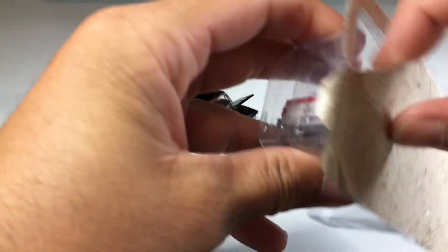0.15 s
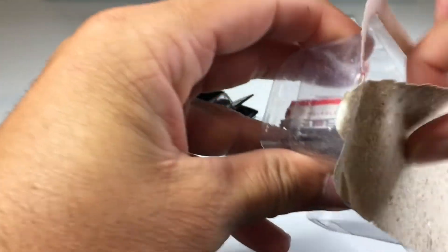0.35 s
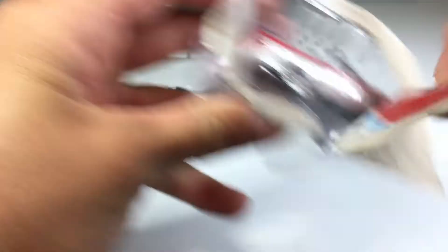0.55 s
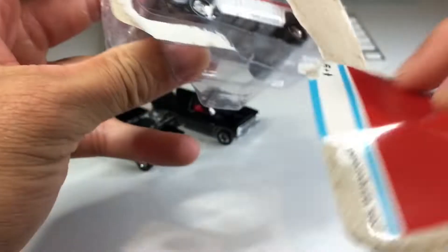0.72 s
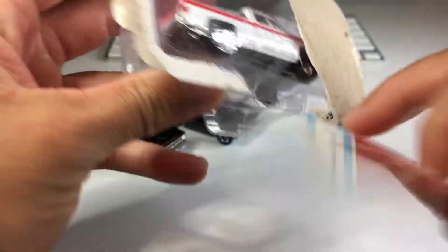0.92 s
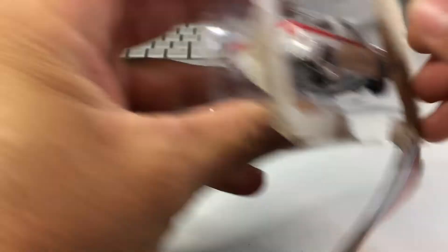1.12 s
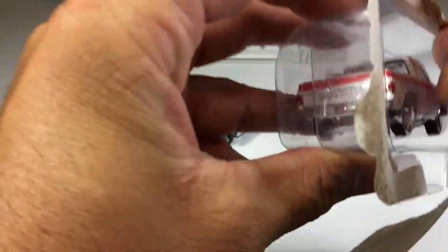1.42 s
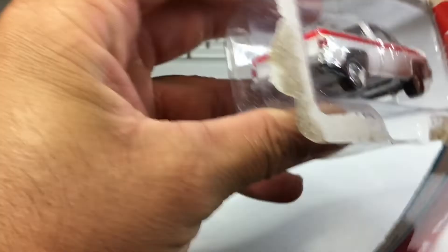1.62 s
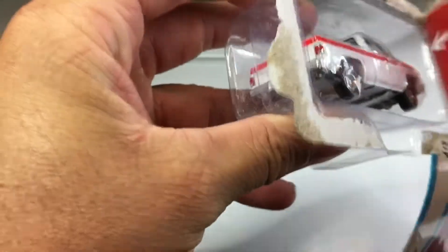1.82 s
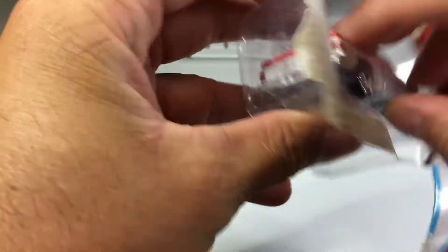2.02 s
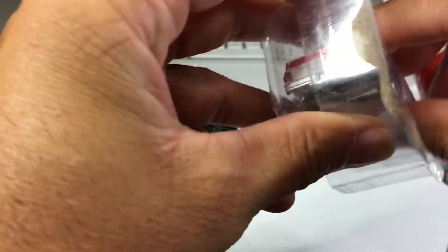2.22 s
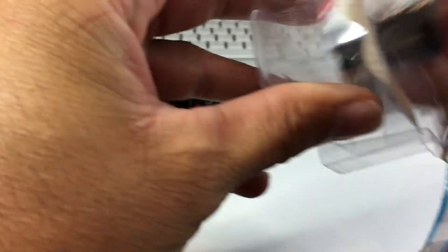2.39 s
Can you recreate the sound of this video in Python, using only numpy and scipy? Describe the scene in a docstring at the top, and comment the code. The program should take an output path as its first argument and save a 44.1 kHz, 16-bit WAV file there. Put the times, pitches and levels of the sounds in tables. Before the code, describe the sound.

A stiff plastic blister package crackles as hands pry it off glued card. After near quiet, sharp snaps begin around 0.2 seconds and build to a loud, dense papery rip at 0.43-0.6. Sparse ticks and small creaks follow until a second, smaller crackling burst at 1.45-1.65. Scattered light pops fade toward 2.5. Close, dry sound with a short room tail and faint low hum.

```python
"""A quiet room, heard close up: hands pry a clear plastic blister off its card.
A low hum of shaped noise lies underneath, with a dull, lumpy rub of the hands on the card.
Glued paper tears in a dense crackle of random clicks; short bursts and creaks also ring the shell.
The shell buckles in single snaps: ragged pushes ring its modes briefly, with a burst of treble.
A short, dull noise tail adds the room around the pack."""
import sys
import numpy as np
from scipy import signal
from scipy.io import wavfile
from scipy.ndimage import uniform_filter1d

SR = 44100
rng = np.random.default_rng(int(sys.argv[2]) if len(sys.argv) > 2 else 0)


def dump_mix(stems):
    """Bounce the given channels to the path in sys.argv[1] as a 16-bit WAV at rate SR."""
    frames = np.atleast_2d(stems).T  # one column per channel
    limited = np.clip(frames, -1, 1)  # hard clip at full scale
    pcm = np.round(limited * 32767).astype(np.int16)
    wavfile.write(sys.argv[1], SR, pcm)


N = 112454  # length in samples, about 2.55 s


def gain_of(db):
    """Turns decibels into a plain multiplier."""
    return 10 ** (np.asarray(db) / 20)


def evened(x):
    """Scales a signal to an average (RMS) level of one."""
    return x / np.sqrt(np.mean(x ** 2) + 1e-20)


def add(mix, start_s, sound):
    """Adds a sound into the mix at its start time, cut off at the end of the mix."""
    part = mix[round(start_s * SR):][:len(sound)]
    part += sound[:len(part)]


def follow(times_s, values):
    """Joins the points of a table by straight lines, one value per sample."""
    return np.interp(np.arange(N) / SR, times_s, values)


def band(x, low_hz, high_hz):
    """Keeps only the sound between two frequencies."""
    return signal.sosfilt(signal.butter(4, [low_hz, high_hz], "band", fs=SR, output="sos"), x)


def colour(x, points):
    """Gives x a spectrum, falling steeply outside the table, with no sound ahead of its cause."""
    points_hz, points_db = np.transpose(points)
    log_hz = np.log(np.fft.rfftfreq(2048, 1 / SR) + 1)
    log_points = np.log(points_hz)
    below = np.maximum(log_points[0] - log_hz, 0)
    above = np.maximum(log_hz - log_points[-1], 0)
    db = np.interp(log_hz, log_points, points_db) - 40 * (below + above)
    log_gain = np.log(gain_of(np.maximum(db, -90)))
    # The Hilbert transform of the log gain gives the phase of the most prompt filter
    full = np.concatenate([log_gain, log_gain[-2:0:-1]])
    taps = np.fft.ifft(np.exp(np.conj(signal.hilbert(full)))).real
    return signal.oaconvolve(x, taps)[:len(x)]


def sparse(per_s, spread_db):
    """Clicks at random moments, a few of them large."""
    sizes = gain_of(spread_db * np.minimum(rng.exponential(1, N), 3))
    return sizes * (rng.random(N) < per_s / SR)


PATCHY_DB = 2.5  # typical rise or fall of a patch before the overall level is evened


def patchy(x):
    """Random patches, a few ms by about 1.5 kHz, raise or lower parts of the sound."""
    spectrum = signal.stft(x, nperseg=128)[2]
    patches = rng.standard_normal(spectrum.T.shape)
    patches = uniform_filter1d(patches, size=4, axis=0)
    patches = uniform_filter1d(patches, size=4, axis=1)
    gains = gain_of(PATCHY_DB * evened(patches).T)
    return signal.istft(spectrum * evened(gains), nperseg=128)[1][:N]


# Spectrum of the room hum: pitch_hz, density_db (dB per Hz, relative)
HUM_SPECTRUM = [(40, 5), (65, 2.5), (100, -12.5), (180, -7), (800, -4.5), (1400, -37), (4000, -54),
                (16000, -45)]
HUM_DB = -55.5


def room_hum():
    """Steady noise, strongest in the bass, makes the low hum of the room."""
    noise = rng.standard_normal(N + 2048)
    settled = colour(noise, HUM_SPECTRUM)[2048:]  # skip the filter's start
    return gain_of(HUM_DB) * evened(settled)


# Dull rub of the hands on the card: time_s, level_db
HAND_RUB = [(0, -45.5), (.42, -63), (.48, -32), (.6, -58.5), (1.06, -51.5), (1.2, -58), (1.55, -59.5),
            (2.55, -66)]
RUB_LUMPS_DB = 4  # typical unevenness of the rub


def hand_rub():
    """Low-pitched friction noise swells unevenly as the hands rub the card."""
    lumps_db = RUB_LUMPS_DB * evened(uniform_filter1d(rng.standard_normal(N), size=1300))
    noise = rng.standard_normal(N) * gain_of(lumps_db)
    level = gain_of(follow(*np.transpose(HAND_RUB)))
    return level * evened(band(noise, 127, 398))


ROOM_DB, ROOM_T60_S, ROOM_DULL_HZ = -14.5, 0.14, 7000  # T60: time to fall by 60 dB


def room(x):
    """A short dull tail from desk and walls, made of fading noise."""
    t = np.arange(SR // 3) / SR
    tail = rng.standard_normal(len(t)) * gain_of(-60 * t / ROOM_T60_S)
    tail *= t > .003  # a short gap before the tail begins
    tail = signal.lfilter(*signal.butter(1, ROOM_DULL_HZ, fs=SR), tail)
    return gain_of(ROOM_DB) * signal.fftconvolve(x, tail / np.linalg.norm(tail))[:N]


# Ways the plastic shell rings, low and middle: pitch_hz (before bending), level_db, t60_s
LOW_SHELL_MODES = [(205, -6, .05), (360, -6, .03), (490, -3, .025), (640, 0, .025), (830, -3, .02),
                   (1120, 0, .02)]
MID_SHELL_MODES = [(1460, 0, .014), (1780, -2, .013), (2150, 0, .012), (2600, -3, .011), (3160, -3, .011),
                   (4200, -7, .009), (5400, -9, .008), (6900, -8, .007)]
BEND, MODE_SPREAD_DB = .05, 2.5  # random shift of pitch (fraction) and of level, each time
FOCUS_DB = 24  # dB lost per octave away from the strongest pitch
RING_LOW_HZ, RING_HIGH_HZ = 148, 8100  # band kept of every shell ring
PUSH_S = .0015  # how long a snap or creak pushes the shell


def ring(modes, pitch_hz, push, draw):
    """A ragged push rings the shell's modes in close pairs, strongest near the given pitch."""
    hz, db, t60_s = np.transpose(modes + modes)[:, :, None]
    t = np.arange(2500) / SR
    weights, bends = draw[:len(hz), None], draw[-len(hz):, None]
    octaves_away = abs(np.log2(hz / pitch_hz))
    db = db + MODE_SPREAD_DB * weights - FOCUS_DB * octaves_away
    waves = np.sin(2 * np.pi * hz * (1 + BEND * bends) * t)
    sound = (gain_of(db - 60 * t / t60_s) * waves).sum(0)
    return np.convolve(sound, np.diff(push))[:2500]


CREAKS_PER_S, CREAK_SPREAD_DB = 520, 1.5
CREAKS_DB = -8  # relative to the body of the tearing


def creaks(level):
    """Many small snaps ring the strained shell at random, in sixteen shapes of their own colour."""
    train, kind = sparse(CREAKS_PER_S, CREAK_SPREAD_DB), rng.integers(0, 16, N)
    out, t = np.zeros(N), np.arange(400) / SR
    for k, hz in enumerate(np.geomspace(600, 7000, num=16)):
        push = rng.standard_normal(400) * t * np.exp(-t / PUSH_S)
        sound = ring(LOW_SHELL_MODES + MID_SHELL_MODES, hz, push, rng.standard_normal(48))
        out += signal.oaconvolve(train * (kind == k), sound / np.linalg.norm(sound))[:N]
    return gain_of(CREAKS_DB) * level * evened(band(out, RING_LOW_HZ, RING_HIGH_HZ))


# Short rips, and snaps that build up slowly in clusters:
# start_s, length_s, body_db, fizz_db, pitch_hz (strongest in the ring)
SHORT_BURSTS = [(0.09, 0.039, -50, -48, 1240), (0.139, 0.0035, -40, -34, 4200),
                (0.204, 0.0036, -27, -61, 1890), (0.357, 0.0048, -28.5, -28, 2100),
                (0.462, 0.0021, -31, -36, 2190), (0.594, 0.0028, -28.5, -36, 2150),
                (1.11, 0.019, -45, -43, 855), (1.357, 0.013, -40, -36, 3600),
                (1.594, 0.014, -39, -40.5, 3170), (1.649, 0.011, -37.5, -42, 2320),
                (1.745, 0.037, -46, -48, 695), (1.982, 0.01, -35.5, -38.5, 600),
                (2.005, 0.046, -53, -55.5, 794)]
BURST_EDGE_S = 0.0054  # time a burst takes to fade in or out
BURST_RING_DB = 2  # level of the shell's ring relative to the burst's body


def burst_rings():
    """Each short burst shakes the shell's modes with swelling noise."""
    out, t = np.zeros(N), np.arange(2500) / SR
    draws = rng.standard_normal((len(SHORT_BURSTS), 48))
    noises = rng.standard_normal((len(SHORT_BURSTS), 2500))
    for (start_s, length_s, body_db, _, hz), draw, noise in zip(SHORT_BURSTS, draws, noises):
        swell = np.clip(np.minimum(t, length_s + BURST_EDGE_S - t) / BURST_EDGE_S, 0, 1)
        sound = ring(LOW_SHELL_MODES + MID_SHELL_MODES, hz, noise * swell, draw)
        sound = sound * np.linalg.norm(swell) / np.linalg.norm(sound)
        add(out, start_s - BURST_EDGE_S / 2, gain_of(body_db + BURST_RING_DB) * sound)
    return band(out, RING_LOW_HZ, RING_HIGH_HZ)


def burst_levels(column):
    """Raises the clicks' level during each short burst, with soft edges."""
    t, levels = np.arange(N) / SR, np.zeros(N)
    for burst in SHORT_BURSTS:
        start_s, length_s = burst[:2]
        inside_s = np.minimum(t - start_s, start_s + length_s - t)
        levels += gain_of(burst[column]) * np.clip(inside_s / BURST_EDGE_S + .5, 0, 1)
    return levels


# Tearing and rubbing: time_s, body_db (mostly below 4 kHz), fizz_db (mostly above 4 kHz)
TEARING = [(0, -49, -50.5), (.04, -56, -67.5), (.18, -57.5, -58), (.2, -38, -46), (.428, -43.5, -37.5),
           (.442, -23.5, -28.5), (.49, -26, -29.5), (.6, -34.5, -39), (.67, -41, -35.5), (.7, -51, -51),
           (.92, -48.5, -45), (.96, -56, -59.5), (1.43, -53, -57.5), (1.441, -39.5, -39),
           (1.47, -42.5, -40.5), (1.49, -33, -35.5), (1.555, -38.5, -31), (1.58, -39, -34.5),
           (1.68, -40, -37), (1.71, -48.5, -51.5), (1.82, -62.5, -71.5), (2.22, -56, -65),
           (2.27, -50, -52.5), (2.38, -48, -62.5), (2.55, -56, -61)]
# Spectrum of the card's body: pitch_hz, density_db (dB per Hz, relative)
CARD_BODY = [(150, -9), (220, -2), (800, -3), (1500, 0.5), (4000, -7.5), (7000, -27)]
# Spectrum of the treble, in the fizz and in the snaps' cracks: pitch_hz, density_db (dB per Hz, relative)
TREBLE = [(2060, -22), (3500, 2.5), (4780, 6), (7000, 7.5), (7700, 7.5), (16000, 2)]
FIBRES_PER_S, FIBRE_SPREAD_DB = 4000, 3.0
CLUMPS_PER_S, CLUMP_S, CLUMP_SPREAD_DB = 500, .0011, 3.0  # clumps shared by body and fizz
BETWEEN_CLUMPS = .8  # crackle left between clumps, against a clump's peak of 1 or more


def tearing():
    """Fibres let go in clumps; clicks sound through the card's body and as fizz."""
    t = np.arange(600) / SR
    clump_shape = t / CLUMP_S * np.exp(1 - t / CLUMP_S)
    shared, out = sparse(CLUMPS_PER_S, CLUMP_SPREAD_DB), np.zeros(N)
    times_s, body_db, fizz_db = np.transpose(TEARING)
    for spectrum, levels_db, burst_column in [(CARD_BODY, body_db, 2), (TREBLE, fizz_db, 3)]:
        own = sparse(CLUMPS_PER_S / 2, CLUMP_SPREAD_DB)
        clumps = np.convolve(shared + own, clump_shape)[:N]
        grain = evened(clumps + BETWEEN_CLUMPS)
        # Fibre clicks stand out from a bed of finer noise
        clicks = (sparse(FIBRES_PER_S, FIBRE_SPREAD_DB) + 0.7) * rng.standard_normal(N)
        level = gain_of(follow(times_s, levels_db)) * grain + burst_levels(burst_column)
        out += colour(clicks * level, spectrum) / np.std(colour(clicks, spectrum))
    return patchy(out) + burst_rings() + creaks(gain_of(follow(times_s, body_db)))


# Buckling snaps: start_s, mid_peak_db, low_db, crack_db, pitch_hz (strongest in the ring)
BUCKLING_SNAPS = [(0.0004, -65, -36, -57, 640), (0.188, -21.5, -59, -47, 1980),
                  (0.2258, -19.5, -40, -58, 3640), (0.2485, -20.5, -42, -35, 3140),
                  (0.273, -10.5, -26.5, -27, 1940), (0.2984, -43, -63, -31, 4040),
                  (0.3158, -11, -69, -24.5, 1580), (0.3218, -31, -31, -31.5, 1460),
                  (0.3818, -27, -34, -32.5, 610), (0.4095, -19.5, -34.5, -38, 2500),
                  (0.4172, -33, -32.5, -43, 2500), (0.4234, -30, -43, -42, 2390),
                  (0.4282, -10.5, -75, -36, 1600), (0.4658, -14.5, -59, -28, 2590),
                  (0.4735, -16, -55, -27.5, 1700), (0.4785, -17, -40, -22, 794),
                  (0.484, -26, -31.5, -30, 205), (0.5121, -25, -28.5, -27.5, 1440),
                  (0.5686, -14, -61, -31.5, 1440), (0.7677, -38, -73, -42.5, 1390),
                  (0.7809, -30, -53, -38.5, 2130), (0.855, -26.5, -72, -47, 1680),
                  (0.8857, -29, -56, -39.5, 2070), (0.8936, -40, -34, -59, 467),
                  (0.9251, -45, -41.5, -41.5, 646), (1.0284, -42, -40, -60, 805),
                  (1.1791, -23, -37, -52, 1850), (1.2841, -45, -44.5, -78, 617),
                  (1.3067, -40.5, -50, -77, 638), (1.3322, -26, -31, -56, 507),
                  (1.476, -23, -56, -52, 1450), (1.4925, -38, -28.5, -47, 600),
                  (1.4979, -15, -37, -46, 3260), (1.507, -27, -44, -49, 3230),
                  (1.528, -24, -30.5, -40, 364), (1.555, -22, -37, -32, 1500),
                  (1.6155, -19.5, -61, -33.5, 3230), (1.737, -28.5, -51, -44, 689),
                  (1.7706, -33, -36, -68, 675), (1.98, -23.5, -39, -48, 2050),
                  (2.0301, -31.5, -54, -47.5, 4100), (2.1582, -34.5, -71, -54.5, 1440),
                  (2.17, -33.5, -58, -53, 4100), (2.2026, -66, -38, -73, 815),
                  (2.2397, -35.5, -58, -77, 2020), (2.266, -38, -43, -59, 3600),
                  (2.2987, -35, -43, -57, 700), (2.3264, -31.5, -53, -43, 2100),
                  (2.3514, -25, -58, -46.5, 7100), (2.3687, -35, -43.5, -46, 301),
                  (2.4007, -39, -28.5, -76, 1150), (2.43, -37, -69, -43.5, 1150)]
CRACK_RISE_S, CRACK_T60_S = 0.001, 0.014
# A pitch below the split steers the low ring, otherwise the middle one; the other keeps its usual centre
LOW_FOCUS_HZ, MID_FOCUS_HZ, SPLIT_HZ = 600, 2500, 1300


def snaps():
    """The shell buckles: each snap is a low ring, a middle ring and a short burst of treble."""
    rings, cracks, t = np.zeros(N), np.zeros(N), np.arange(1500) / SR
    draws = rng.standard_normal((len(BUCKLING_SNAPS), 48))
    noises = rng.standard_normal((len(BUCKLING_SNAPS), 2, 1500))
    crack_shape = t / (t + CRACK_RISE_S) * gain_of(-60 * t / CRACK_T60_S)
    crack_shape = crack_shape / np.sqrt(np.mean(crack_shape[:350] ** 2))  # level over the first 8 ms
    for snap, draw, (push_noise, crack_noise) in zip(BUCKLING_SNAPS, draws, noises):
        start_s, mid_db, low_db, crack_db, hz = snap
        push = (push_noise * t * np.exp(-t / PUSH_S))[:400]
        low_hz, mid_hz = (hz, MID_FOCUS_HZ) if hz < SPLIT_HZ else (LOW_FOCUS_HZ, hz)
        low = ring(LOW_SHELL_MODES, low_hz, push, draw[:24])
        mid = ring(MID_SHELL_MODES, mid_hz, push, draw[24:])
        low = low / np.sqrt(np.mean(low[:350] ** 2))
        mid = mid / abs(mid).max()
        add(rings, start_s, gain_of(low_db) * low + gain_of(mid_db) * mid)
        add(cracks, start_s, gain_of(crack_db) * crack_shape * crack_noise)
    unit = np.linalg.norm(colour(signal.unit_impulse(2048), TREBLE))  # the filter's own gain
    return band(rings, RING_LOW_HZ, RING_HIGH_HZ) + patchy(colour(cracks, TREBLE)) / unit


def scene():
    """Hum and dull rub lie under the tearing and snaps, which also sound in the room."""
    pack = tearing() + snaps()
    return (room_hum() + hand_rub() + room(pack) + pack)[None]


EDGE_HZ = 16000  # upper limit of the sound


def record(dry):
    """Filters away the deepest bass and the highest treble."""
    dry = signal.lfilter(*signal.butter(2, 45, "high", fs=SR), dry)
    low_pass = signal.firwin(255, EDGE_HZ, window=("kaiser", 9), fs=SR)
    return signal.oaconvolve(dry, low_pass[None], "same")


dry = scene()
out = record(dry)
dump_mix(out)
```